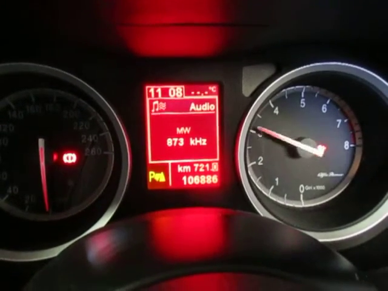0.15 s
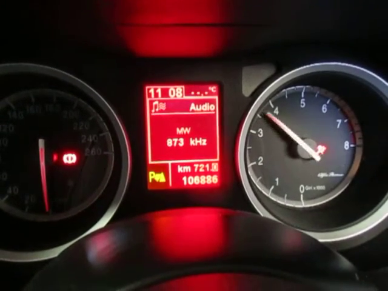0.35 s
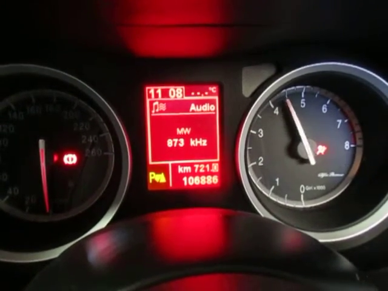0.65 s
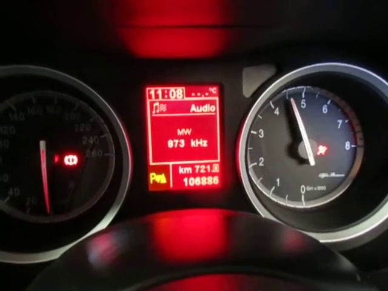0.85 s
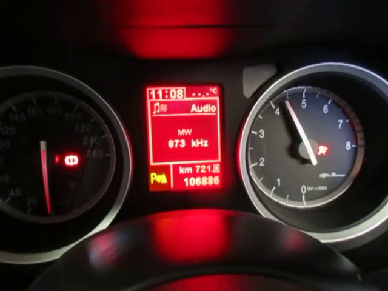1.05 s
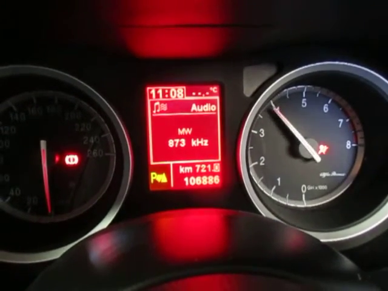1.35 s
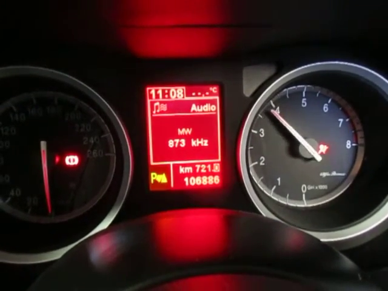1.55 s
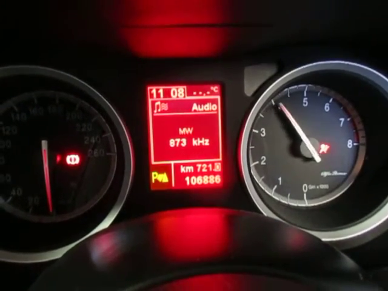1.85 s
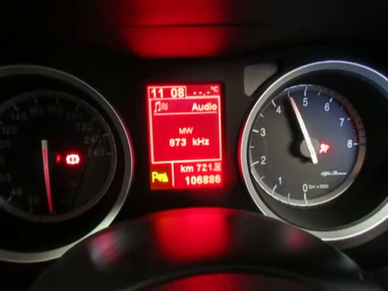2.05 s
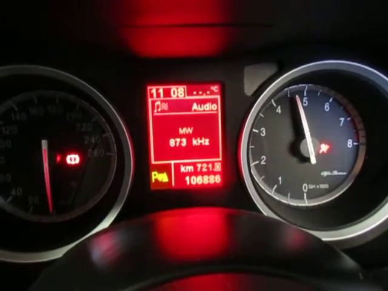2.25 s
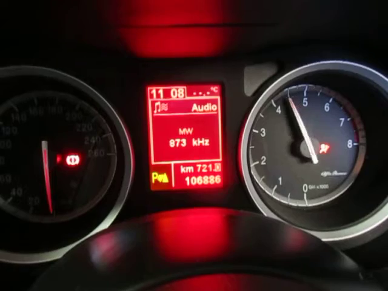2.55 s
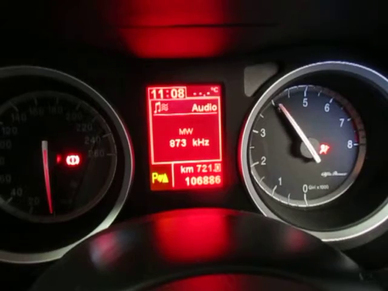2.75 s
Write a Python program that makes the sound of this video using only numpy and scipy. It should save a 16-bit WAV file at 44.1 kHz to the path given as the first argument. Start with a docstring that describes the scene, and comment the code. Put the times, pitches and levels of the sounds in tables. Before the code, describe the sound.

Inside a parked car, a petrol engine booms as its revs climb, turn briefly harsh and drop. A small tick sounds during a second climb, which peaks and falls away. The microphone at the driver's seat also catches deep rumble.

```python
"""A four-cylinder petrol engine revved twice, car standing still; one microphone at the driver's seat.
From the start the firing tone booms in the cabin, swelling and fading as the revs sweep, with weaker
engine orders above it. Clatter and hiss rise with the revs; a deep rumble surges as the throttle changes.
The revs peak at half a second, turn to a rasp and sink. A small tick sounds as they climb again;
at two seconds they peak and rasp once more, then fall away."""
import sys
import numpy as np
from scipy import signal
from scipy.fft import rfft, irfft
from scipy.io import wavfile
from scipy.ndimage import uniform_filter1d

SR = 44100
rng = np.random.default_rng(int(sys.argv[2]) if len(sys.argv) > 2 else 0)


def generate_wav(sig):
    """Save sig (samples, or channels by samples) to the path in sys.argv[1] as 16-bit PCM at SR."""
    pcm = np.round(np.clip(np.atleast_2d(sig).T, -1, 1) * 32767).astype(np.int16)
    wavfile.write(sys.argv[1], SR, pcm)


N = 127890
MID_REVS_HZ = 140   # firings per second at mid revs


def from_db(db):
    """Decibels to gain."""
    return 10 ** (np.asarray(db) / 20)


def rms_one(x):
    """Scale to unit power."""
    return x / np.sqrt(np.mean(x ** 2) + 1e-20)


def in_time(rows):
    """Join rows of seconds and value into a curve at every sample."""
    return np.interp(np.arange(N) / SR, *np.transpose(rows))


def swell(crest_s, half_s):
    """A bell-shaped rise and fall around a moment."""
    return np.exp(-.5 * ((np.arange(N) / SR - crest_s) / half_s) ** 2)


def coloured(x, spectrum):
    """Give a steady sound a spectrum that rolls off past both ends; unit power."""
    hz, db = np.transpose(spectrum)
    bins = np.maximum(np.arange(N // 2 + 1) * SR / N, 1)
    gain = from_db(np.interp(np.log(bins), np.log(hz), db))
    skirts = np.minimum(bins / hz[0], 1) ** 2 * np.minimum(hz[-1] / bins, 1) ** 2
    return rms_one(irfft(rfft(x) * gain * skirts, N))


def drift(rate_hz):
    """A random wander, mostly slower than rate_hz; unit power."""
    bins = np.arange(N // 2 + 1) * SR / N
    return rms_one(irfft(rfft(rng.standard_normal(N)) / (1 + (bins / rate_hz) ** 2) ** 2, N))


def partial(turns, waver, waver_hz=22.6):
    """One engine order, unsteady in strength and phase."""
    angle = 2 * np.pi * (turns + rng.random())
    tone = (1 + waver * drift(waver_hz)) * np.cos(angle)
    return rms_one(tone + waver * drift(waver_hz) * np.sin(angle))


def engine_tone(firings, doublings, boom_waver=.068):
    """The firing boom, its next two harmonics, and weaker orders gliding through cabin resonances."""
    # Firing tone, octave and third harmonic at the seat. Each row: time in seconds, level in dB.
    boom = [(0.0, -12), (0.02, -19), (0.08, -9.5), (0.12, -9.5), (0.22, -18.5), (0.33, -10.5),
            (0.35, -15.5), (0.5, -12.5), (0.59, -23), (0.61, -16), (0.75, -9.5), (0.81, -20.5), (0.9, -12),
            (0.97, -11.5), (1.02, -13.5), (1.07, -32), (1.15, -14), (1.46, -12.5), (1.5, -21.5),
            (1.65, -10.5), (1.75, -17.5), (1.82, -13), (1.92, -13), (1.97, -30), (2.0, -23), (2.03, -33),
            (2.08, -13), (2.2, -15), (2.28, -10), (2.36, -27), (2.46, -11.5), (2.51, -12.5), (2.6, -26.5),
            (2.75, -12.5), (2.85, -11), (2.9, -16)]
    octave = [(0, -20.5), (.05, -31), (.12, -24), (.19, -29), (.36, -27.5), (.5, -35.5), (.58, -21),
              (.76, -32), (.84, -22.5), (.97, -18.5), (1.09, -27.5), (1.16, -21), (1.37, -21), (1.46, -27),
              (1.7, -24.5), (1.84, -36.5), (1.95, -22.5), (2.1, -18.5), (2.3, -29.5), (2.36, -24),
              (2.51, -19.5), (2.61, -29.5), (2.68, -22), (2.78, -23.5), (2.85, -35)]
    third = [(0, -30.5), (.2, -39), (.33, -28), (.48, -31.5), (.66, -26), (.75, -42), (.82, -27.5),
             (1.06, -38.5), (1.21, -27), (1.33, -33), (1.46, -40), (1.68, -34), (1.97, -25), (2.18, -26.5),
             (2.27, -38), (2.38, -30), (2.6, -40), (2.72, -26), (2.86, -34)]
    # The weaker orders before the cabin colours them. Each row: multiple of the firing rate,
    # level at mid revs in dB, dB gained per doubling of the revs.
    orders = [(.75, -33, -8), (1.25, -40, 5), (1.37, -31, 30), (1.5, -37.5, 2), (1.75, -34.5, -10),
              (2.25, -52, 12), (2.5, -37.5, 20), (3.5, -44.5, 6), (4, -37.5, 4), (4.5, -47, 27),
              (5, -48, 33), (6.5, -55, 12), (7, -54, 28), (7.5, -48.5, 17), (8, -45.5, 12), (9, -47.5, -7),
              (10, -47, 13), (15, -48, 26)]
    # The cabin's resonances. Each row: frequency in Hz, gain in dB.
    cabin = [(30, 2.5), (400, -2.5), (460, 3), (495, 6), (550, -2), (580, 1.5), (610, 2.5), (642, 7.5),
             (690, -2), (800, 0.5), (900, -3), (1030, -13.5), (1135, 10.5), (1250, -16), (1365, 8),
             (1500, -11), (2000, -8), (2410, 3), (2600, 0)]
    out = from_db(in_time(boom)) * partial(firings, boom_waver)
    out += from_db(in_time(octave)) * partial(2 * firings, 2 * boom_waver)
    out += from_db(in_time(third)) * partial(3 * firings, 2 * boom_waver)
    cabin_hz, cabin_db = np.transpose(cabin)
    for multiple, db, rise_db in orders:
        waver = .42 if multiple == round(multiple) else .48   # whole orders are a little steadier
        resonance_db = np.interp(multiple * MID_REVS_HZ * 2 ** doublings, cabin_hz, cabin_db)
        out += from_db(db + rise_db * doublings + resonance_db) * partial(multiple * firings, waver)
    return out


def panel_rings(x):
    """The bulkhead and dashboard ring in narrow bands as sound passes through; unit power."""
    # Their resonances. Each row: frequency in Hz, width in Hz, lift in dB.
    rings = [(1010, 27, 4), (1140, 22, 2.5), (1373, 25, 5.5), (1763, 25, -0.5), (2420, 16, 2.5),
             (3030, 35, 5), (3490, 23, 0.5), (5990, 52, 7), (7400, 60, 4), (7900, 50, -3), (8470, 45, 5.5)]
    bins = np.arange(N // 2 + 1) * SR / N
    lift_db = sum(db / (1 + (2 * (bins - hz) / width_hz) ** 2) for hz, width_hz, db in rings)
    return rms_one(irfft(rfft(x) * from_db(lift_db), N))


def clatter(firings, repeat_share=.28, pulsing=.12):
    """Valve gear and pistons: noise that partly repeats every four firings and beats with each one."""
    # The clatter's colour through the bulkhead. Each row: frequency in Hz, relative level in dB.
    spectrum = [(500, -13), (650, -7), (820, -11), (980, -4.5), (1130, 2), (1250, 1), (1380, 0), (1550, -1),
                (1900, 2), (2200, 0.5), (2430, 1), (2650, -3.5), (2950, -3), (3100, -9), (3600, -6),
                (4100, -11.5), (4500, -19), (4850, -32), (5400, -27)]
    # Its strength at the seat. Each row: time in seconds, level in dB.
    level = [(0, -25.5), (.1, -25.5), (.22, -26.5), (.42, -23.5), (.75, -23.5), (1.0, -25.5), (1.2, -26),
             (1.38, -26.5), (1.68, -25), (1.9, -22.5), (2.2, -23.5), (2.33, -25.5), (2.6, -26.5),
             (2.9, -27.5)]
    pattern = rng.standard_normal(1200)
    repeating = rms_one(np.interp(firings / 4 % 1, np.linspace(0, 1, len(pattern)), pattern))
    contacts = np.sqrt(repeat_share) * repeating + np.sqrt(1 - repeat_share) * rng.standard_normal(N)
    beat = 1 + pulsing * np.cos(2 * np.pi * firings)
    return from_db(in_time(level)) * panel_rings(coloured(contacts * beat, spectrum))


def hiss(firings, pulsing=.035):
    """Air and belts hiss brightly, fluttering once per turn of the crank."""
    # The colour of the hiss. Each row: frequency in Hz, relative level in dB.
    spectrum = [(4000, -15), (4850, -16), (5300, -4), (6050, -2), (6600, -1.5), (7400, -2), (8100, -.5),
                (8430, 0), (8800, -1.5), (9500, -2.5), (10000, -4.5), (10800, -3), (11500, -8), (12100, -7),
                (14000, -16.5), (15700, -25)]
    # It builds under throttle and drops as that shuts. Each row: time in seconds, level in dB.
    level = [(0, -35.5), (.17, -37.5), (.3, -35.5), (.62, -34.5), (.71, -36), (1.0, -37), (1.38, -37.5),
             (1.75, -36), (2.08, -34.5), (2.15, -35.5), (2.36, -38), (2.9, -39)]
    air = rng.standard_normal(N) * (1 + pulsing * np.cos(np.pi * firings))
    return from_db(in_time(level)) * panel_rings(coloured(air, spectrum))


def panel_drone(doublings, mid_revs_db=-23.5, db_per_doubling=10):
    """The body panels drone around the microphone, louder as the revs rise."""
    # The colour of the drone. Each row: frequency in Hz, relative level in dB.
    spectrum = [(70, -16), (85, -15), (105, -1.5), (190, -2.5), (225, -2), (270, -6.5), (340, -9.5),
                (420, -10.5), (520, -13.5), (640, -16), (800, -33.5)]
    gain = from_db(mid_revs_db + db_per_doubling * doublings)
    return gain * coloured(rng.standard_normal(N), spectrum)


def deep_rumble(evenness=.35):
    """A deep rumble that surges as the throttle changes."""
    # The colour of the rumble. Each row: frequency in Hz, relative level in dB.
    spectrum = [(18, -11), (25, -6), (33, 7.5), (48, -4), (58, -9), (66, 7), (80, -17), (110, -6),
                (200, -40)]
    # Its surges. Each row: time in seconds, level in dB.
    level = [(0.0, -24), (0.06, -34), (0.1, -24), (0.15, -35), (0.19, -24), (0.5, -32), (0.64, -18),
             (0.76, -34), (1.06, -29), (1.16, -34), (1.19, -23), (1.44, -37), (1.65, -24), (1.78, -43),
             (1.8, -33), (1.99, -30), (2.08, -22), (2.43, -37), (2.66, -29), (2.84, -40), (2.87, -24),
             (2.9, -20)]
    rumble = coloured(rng.standard_normal(N), spectrum)
    power = uniform_filter1d(uniform_filter1d(rumble ** 2, size=3000), size=3000)
    return from_db(in_time(level)) * rumble / power ** evenness   # chance swells are partly evened out


def rasp(firings, pulsing=.3):
    """The engine turns harsh just past each peak of the revs, pulsing once per turn of the crank."""
    # The two rasps. Each row: crest in seconds, half length in seconds, level in dB.
    crests = [(0.622, .028, -26), (2.05, 0.053, -25)]
    # Their colour. Each row: frequency in Hz, relative level in dB.
    spectrum = [(900, -5), (1300, -13), (1800, 9.5), (2250, -1), (2450, 8), (2650, -6.5), (3000, -2),
                (3800, -1), (4300, -9.5), (4850, -29), (6000, -20), (9000, -16), (15000, -36)]
    grit = rng.standard_normal(N) * (1 + pulsing * np.cos(np.pi * firings))
    envelope = sum(from_db(db) * swell(crest_s, half_s) for crest_s, half_s, db in crests)
    return envelope * coloured(grit, spectrum)


def tick(at_s=1.5393, db=-15.5):
    """One small, bright tick inside the cabin."""
    # The colour of the tick. Each row: frequency in Hz, relative level in dB.
    spectrum = [(1500, -25), (2700, 5), (3300, -3), (4000, 2), (4850, -20), (6000, -11), (7000, -10),
                (8000, -3), (9500, -20), (13000, -38)]
    return from_db(db) * swell(at_s, half_s=.001) * coloured(rng.standard_normal(N), spectrum)


def scene():
    """The cabin in mono from the driver's seat; the engine's layers share one flywheel-smoothed speed."""
    # Engine speed. Each row: time in seconds, firings per second.
    revs = [(0, 115.4), (0.12, 125.5), (0.3, 142.1), (0.44, 153.8), (0.52, 158.9), (0.58, 156.7),
            (0.66, 152.8), (0.85, 142.2), (1.1, 127.0), (1.2, 124.6), (1.3, 124.7), (1.42, 128.4),
            (1.6, 137.1), (1.8, 152.1), (1.92, 159.1), (2.0, 161.0), (2.07, 160.0), (2.2, 152.7),
            (2.55, 133.0), (2.9, 116.2)]
    firing_hz = uniform_filter1d(in_time(revs), size=2600, mode="nearest")
    firings = np.cumsum(firing_hz) / SR
    doublings = np.log2(firing_hz / MID_REVS_HZ)
    engine = engine_tone(firings, doublings) + clatter(firings) + rasp(firings) + hiss(firings)
    return (engine + panel_drone(doublings) + deep_rumble() + tick())[None]


def record(dry):
    """The ends are eased and the top of the treble is cut steeply."""
    ease_s, cutoff_hz = .002, 15700
    from_end = np.minimum(np.arange(N), np.arange(N)[::-1])
    ease = np.minimum(from_end / (ease_s * SR), 1)
    return signal.sosfilt(signal.ellip(12, .1, 90, cutoff_hz, fs=SR, output="sos"), dry * ease)


dry = scene()
out = record(dry)
generate_wav(out)
```